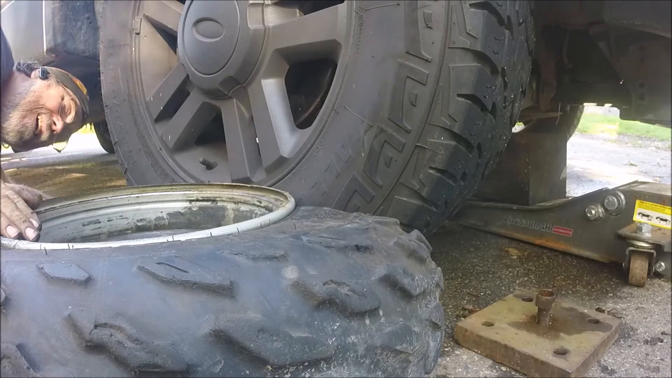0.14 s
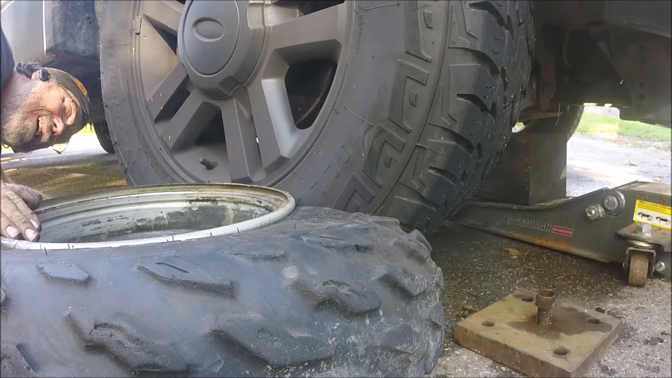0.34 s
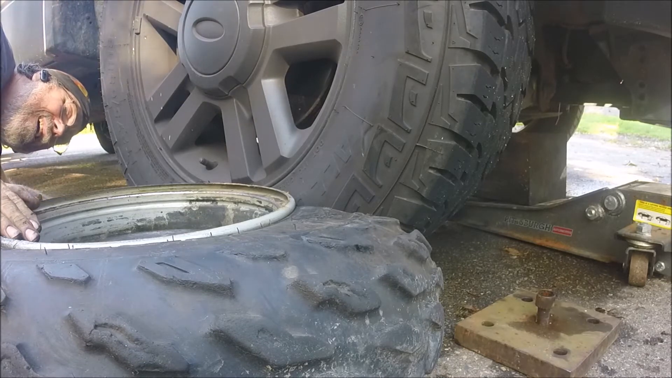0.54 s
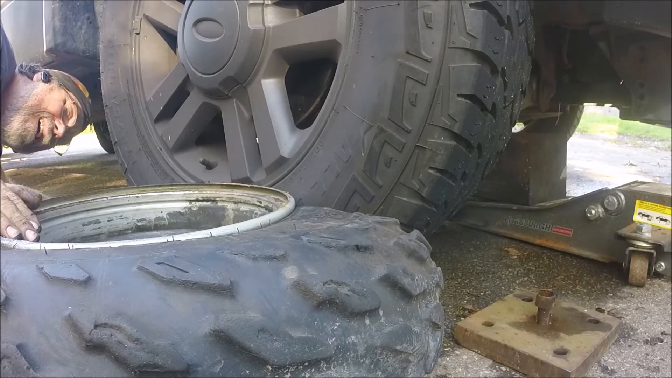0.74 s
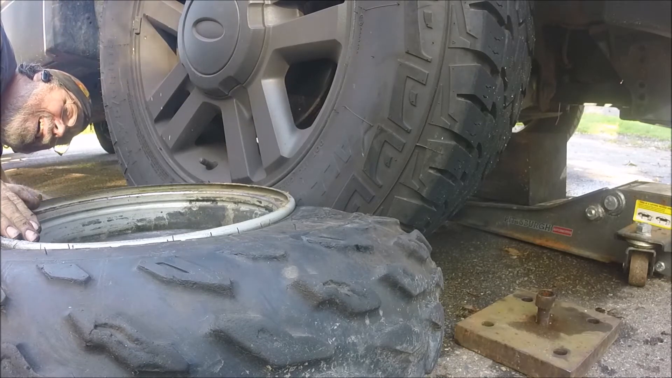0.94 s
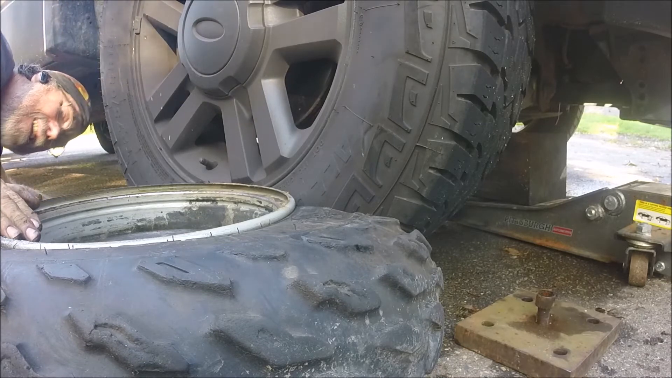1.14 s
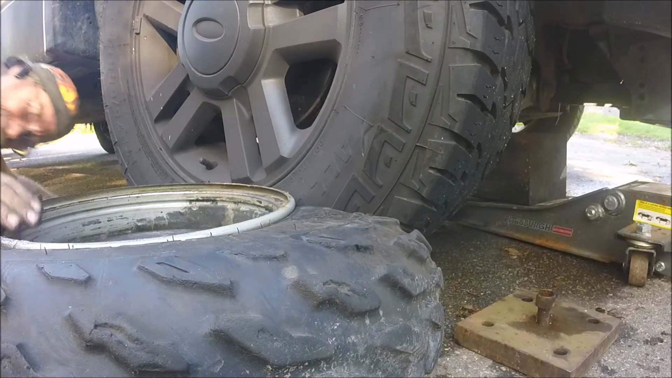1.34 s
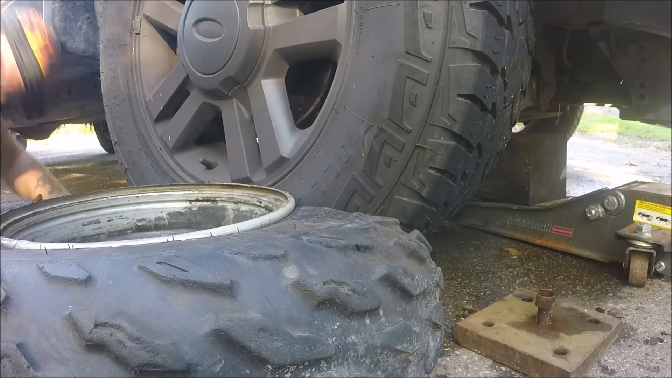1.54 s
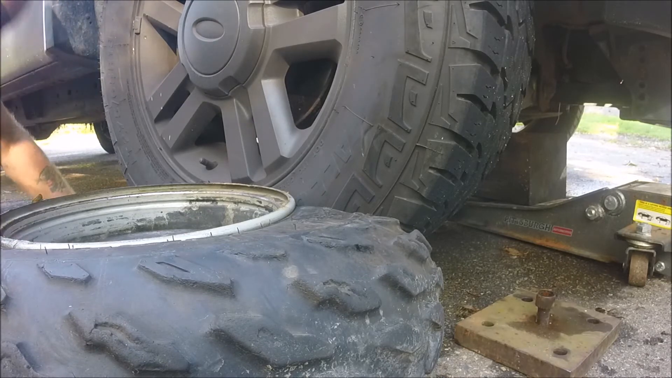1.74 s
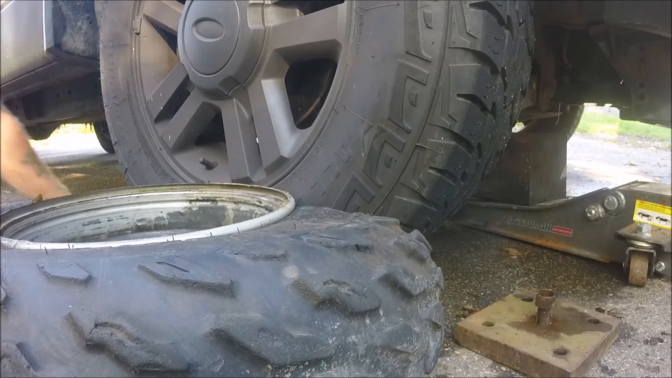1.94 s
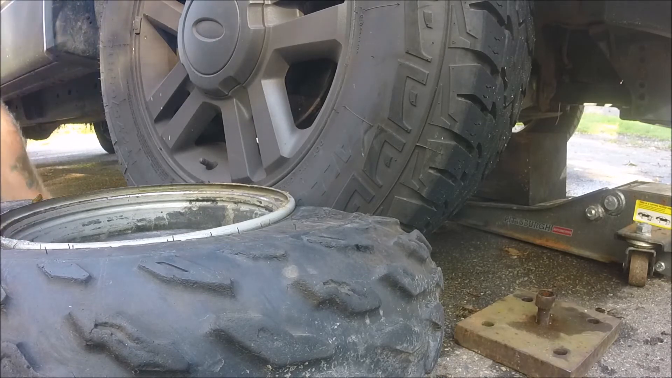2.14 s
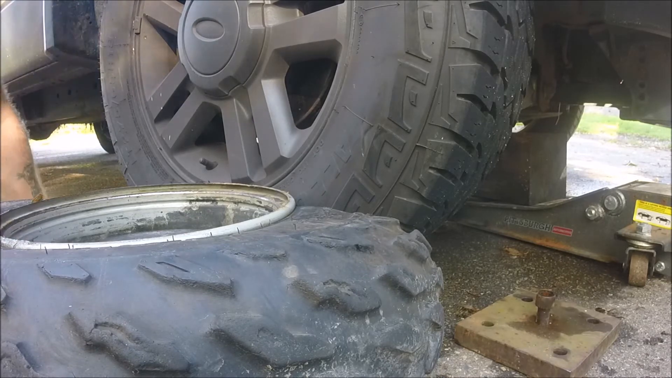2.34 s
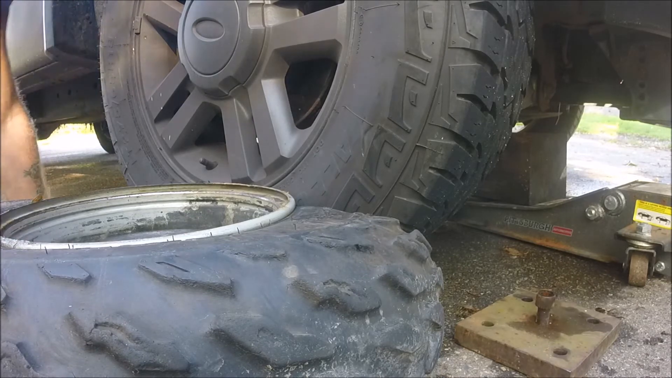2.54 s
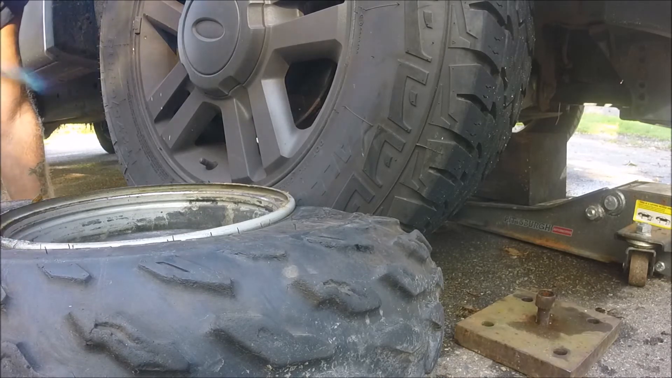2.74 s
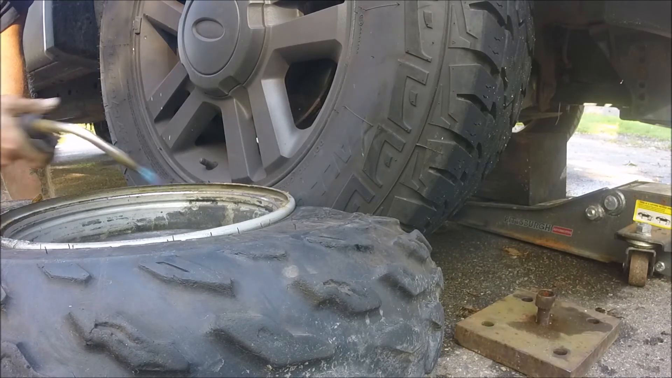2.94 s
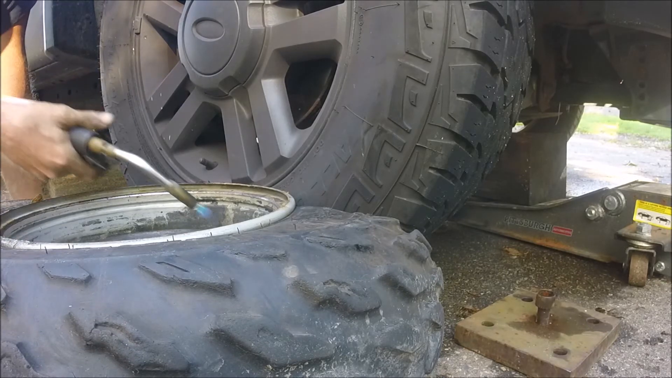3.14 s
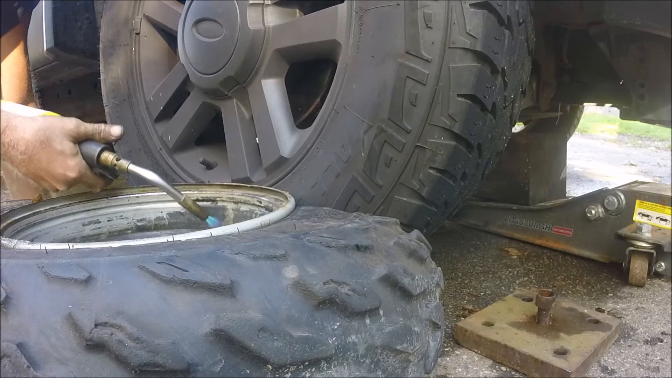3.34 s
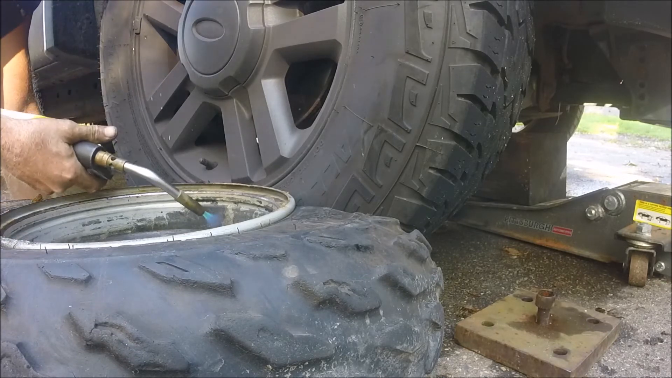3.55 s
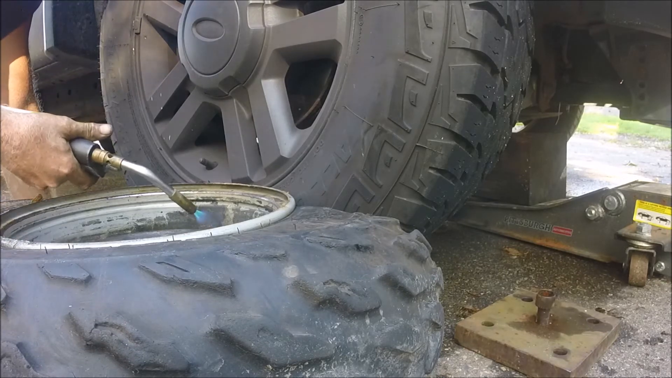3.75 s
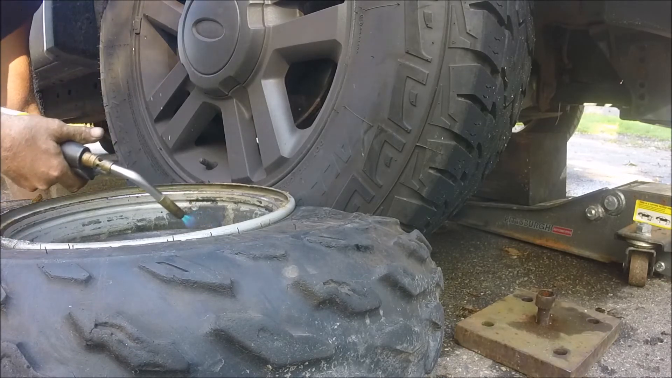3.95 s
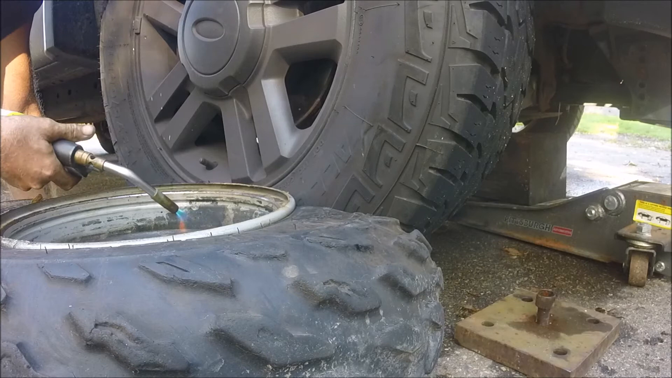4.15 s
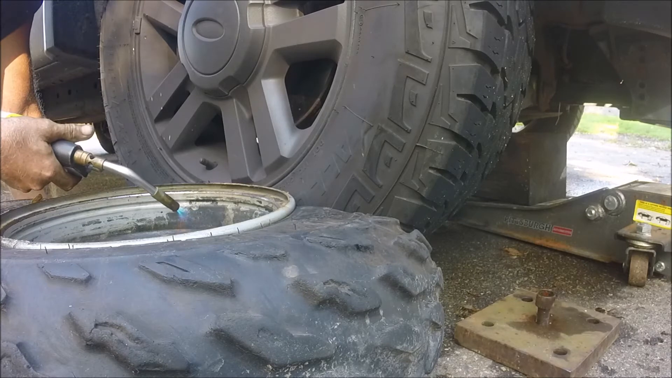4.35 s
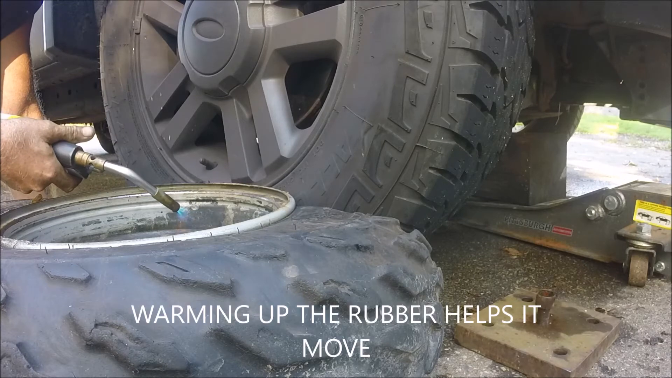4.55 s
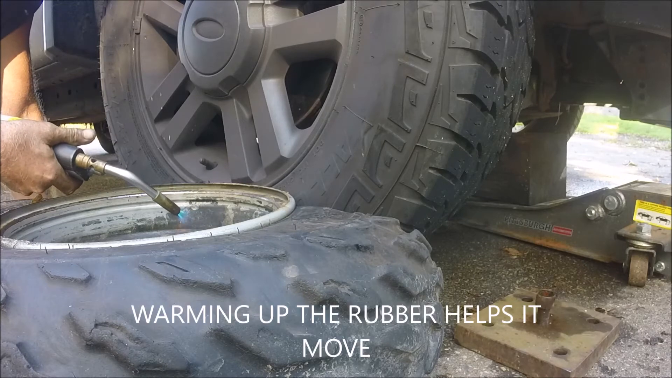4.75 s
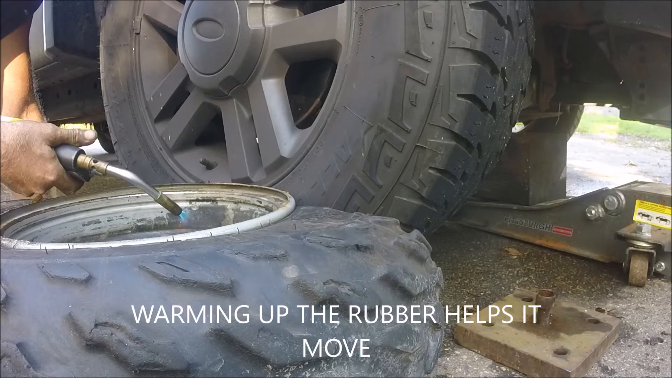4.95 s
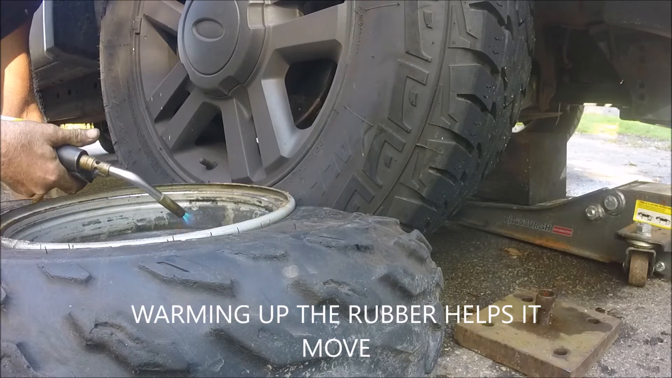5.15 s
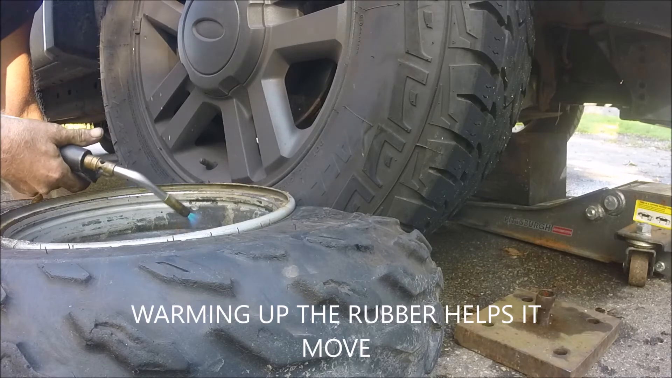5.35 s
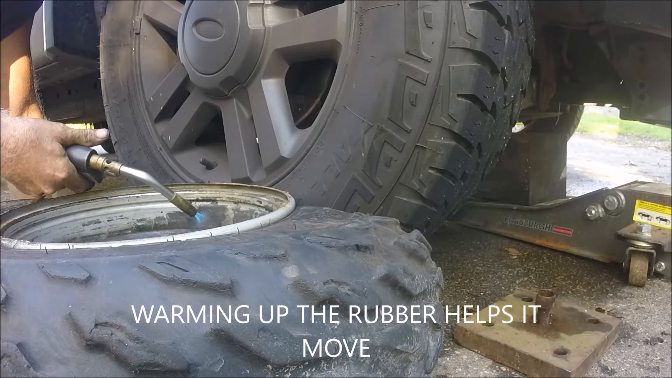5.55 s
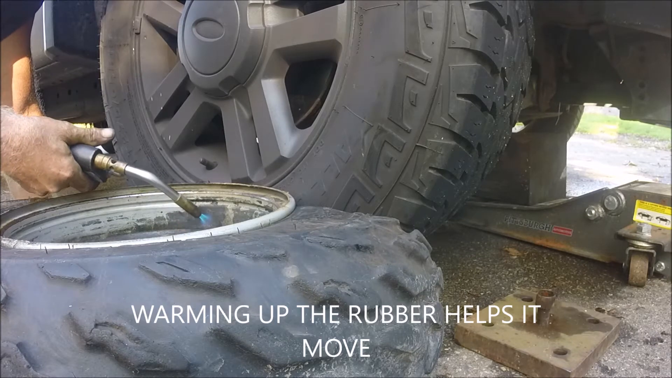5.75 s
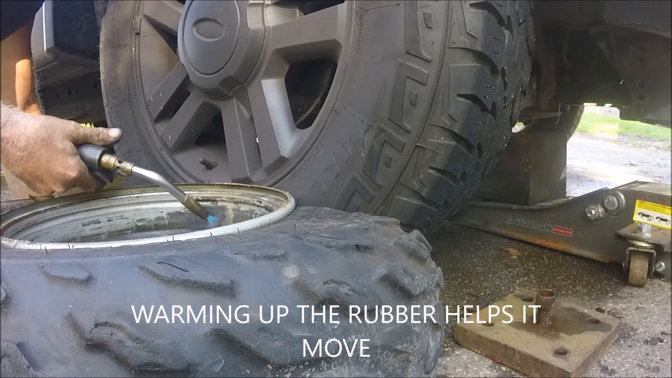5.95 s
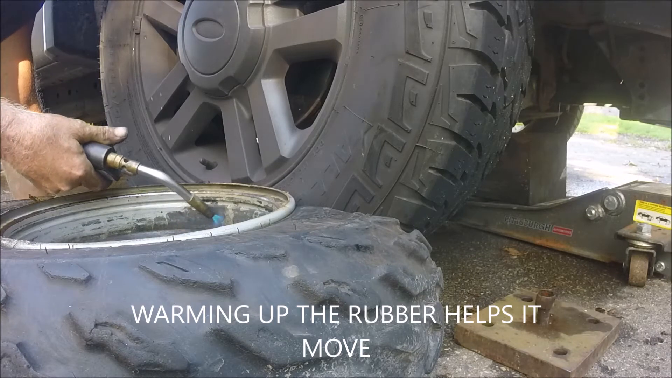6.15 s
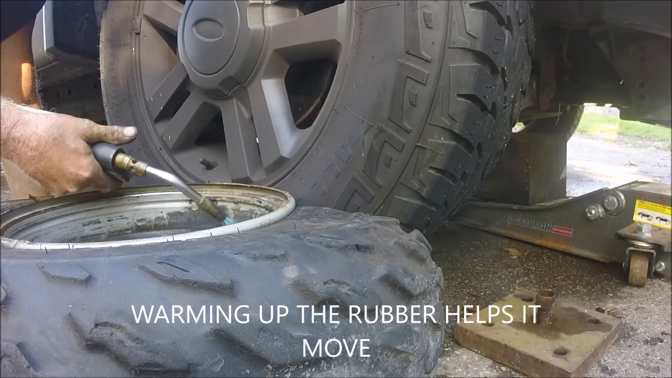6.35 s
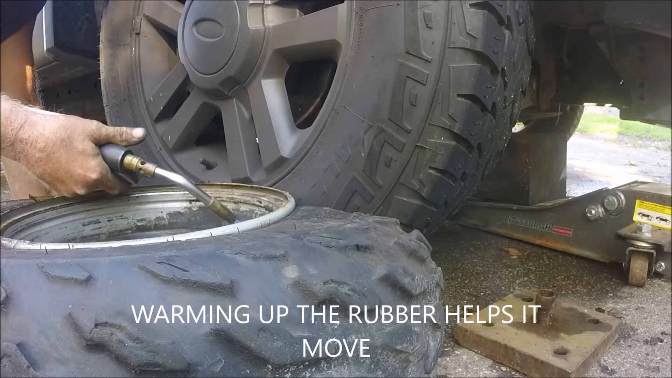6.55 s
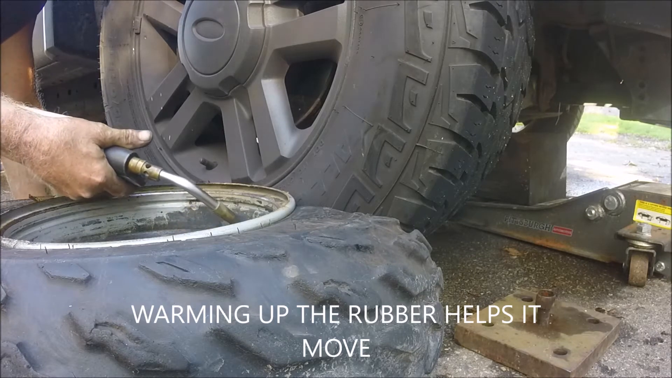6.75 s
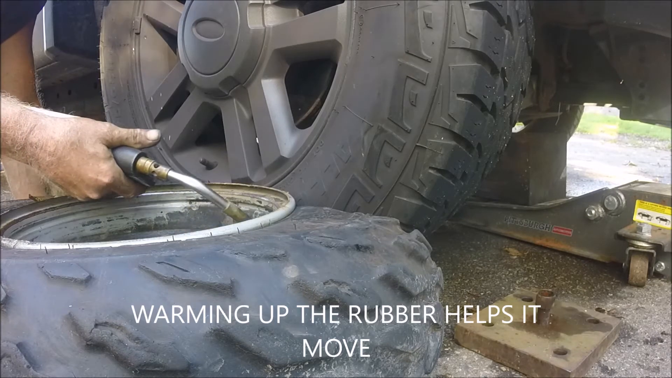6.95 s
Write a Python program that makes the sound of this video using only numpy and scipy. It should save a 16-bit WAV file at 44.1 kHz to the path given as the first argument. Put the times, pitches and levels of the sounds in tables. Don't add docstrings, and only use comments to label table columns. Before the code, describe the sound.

Close handheld camera in an open workshop beside a tire. Low distant rumble and faint hiss, a dull rub with soft knocks, later another thump and bright scrape. A small valve clinks, gas hisses briefly, an igniter snaps and the torch pops alight. The flame roars loudly, swings over the rim, then settles inside the steel wheel, hollow and resonant, its tone shifting until the end.

```python
import sys
import numpy as np
from scipy import signal
from scipy.fft import rfft, irfft
from scipy.io import wavfile
from scipy.ndimage import uniform_filter1d, map_coordinates

SR = 44100
rng = np.random.default_rng(int(sys.argv[2]) if len(sys.argv) > 2 else 0)


def ratio(d):
    e = np.asarray(d, float) / 20
    return 10 ** e


def output_pcm(signal):
    pcm = np.clip(np.atleast_2d(signal).T, -1, 1) * 32767
    wavfile.write(sys.argv[1], SR, np.round(pcm).astype(np.int16))


N = 308024
T_S = np.arange(N) / SR
BLOCK, HOP = 2048, 512
HZ = np.fft.rfftfreq(BLOCK, 1 / SR)
FRAMES_S = np.arange(-(-N // HOP) + 1) * HOP / SR


def unit(x):
    return x / np.sqrt(np.mean(x ** 2) + 1e-20)


def along(points, hz):
    f, v = np.transpose(points)
    return np.interp(np.log(hz + 1), np.log(f + 1), v)


def curves(rows, t=T_S):
    s, *cols = np.transpose(rows)
    return [np.interp(t, s, c) for c in cols]


def wobble(knots_per_s):
    knots = rng.standard_normal(int(N * knots_per_s / SR) + 4)
    return map_coordinates(knots, [np.arange(N) * knots_per_s / SR])


def power(modes):
    total = np.zeros(len(HZ))
    for f, width, db in modes:
        damping = (HZ * width) ** 2
        total += ratio(2 * db) * damping / ((f * f - HZ * HZ) ** 2 + damping)
    return total


def noise(gain, source=None):
    if source is None:
        source = rng.standard_normal(N)
    z = signal.stft(source, nperseg=BLOCK, noverlap=BLOCK - HOP)[2]
    return signal.istft(z * gain.reshape(len(HZ), -1), nperseg=BLOCK, noverlap=BLOCK - HOP)[1][:N]


def add(track, start_s, modes, attack_s):
    t = np.arange(SR // 5) / SR
    ring = sum(ratio(db - 60 * t / t60) * np.sin(2 * np.pi * hz * t) for hz, db, t60 in modes)
    track[round(start_s * SR):][:len(t)] += ring * (1 - np.exp(-t / attack_s))


def ridge(centre_hz, width_hz, db):
    return ratio(db * np.exp(-((HZ[:, None] - centre_hz) / width_hz) ** 2))


def dip(centre_hz, width_hz, depth):
    return 1 - np.clip(depth, 0, .97) / (1 + ((HZ[:, None] - centre_hz) / width_hz) ** 2)


def around(middle_s, half_s):
    return np.exp(-((FRAMES_S - middle_s) / half_s) ** 2)


# t/s, share in free air [0-1], share shaded by rim [0-1],
# f/Hz cancelled by near rim, f/Hz reinforced by wheel face
TORCH_PATH = [(2.66, 0.84, 0.2, 1380, 3400), (2.9, 1, 0.07, 1440, 3600), (3.0, 0.28, 0.18, 1900, 3600),
              (3.08, 0.74, 0.3, 1740, 3800), (3.2, 0.63, 0.4, 1330, 5100), (3.27, .4, 0.53, 1170, 5050),
              (3.42, 0.17, 0.58, 1210, 5000), (3.6, 0.1, 0.58, 1300, 4430), (3.77, 0.15, .8, 1400, 3700),
              (3.85, 0, .4, 1420, 3800), (4.1, .02, 0.32, 1500, 4500), (4.4, 0.06, 0, 1500, 5020),
              (5.15, 0.08, .05, 1500, 4870), (5.6, .02, 0.4, 1450, 4500), (5.8, 0.06, .55, 1410, 3850),
              (6.15, 0.23, 0.78, 1400, 3700), (6.45, 0, 0.87, 1196, 3460), (6.98, 0, 0.91, 1040, 3460)]


def torch_pose():
    air, shade, near_hz, face_hz = curves(TORCH_PATH, FRAMES_S)
    air, shade = np.clip(air, 0, 1), np.clip(shade, 0, 1)
    pose = np.array([air, shade, np.clip(1 - air - shade, 0, 1)])
    return air, shade, pose / pose.sum(axis=0), near_hz, face_hz


# f/Hz, width/Hz, level/dB
AIR_MODES = [(231, 44, -15.5), (495, 83, -20), (700, 140, -22), (1055, 36, 1.5), (1500, 190, -14),
             (2300, 59, -14), (2670, 97, -18), (3600, 280, -19), (4500, 520, -19.5), (6200, 990, -28)]
SHADED_MODES = [(200, 78, -15.5), (259, 40, -6), (507, 30, 0), (619, 37, 2.5), (826, 89, -6),
                (979, 40, 2.5), (1400, 77, -23), (1900, 60, -14), (2380, 190, -17), (3130, 110, -24.5),
                (3600, 170, -25.5), (4104, 230, -17.5), (5050, 550, -12.5), (5920, 1170, -16),
                (7920, 500, -48)]
WHEEL_MODES = [(199, 25, -14.5), (248, 82, -7), (528, 48, -8.5), (658, 71, -4), (963, 114, -2),
               (1116, 31, -6), (1400, 50, -12), (1610, 21, -17), (2010, 34, -25), (2400, 130, -10),
               (2810, 55, -12.5), (3200, 310, -19), (3680, 330, -20), (4200, 630, -14.5),
               (5020, 330, -19.5), (5460, 180, -16), (6300, 390, -20), (6930, 180, -21.5), (8500, 500, -32)]
# f/Hz, level/dB per Hz
FLAME_FLOOR = [(25, -46), (60, -40.5), (130, -21), (300, -19.5), (400, -56), (800, -17), (2000, -14.5),
               (5000, -33), (9000, -37.5), (14000, -71), (16000, -62)]


def cavity_colour(pose):
    floor = ratio(2 * along(FLAME_FLOOR, HZ))
    log_power = np.log([power(m) + floor for m in (AIR_MODES, SHADED_MODES, WHEEL_MODES)])
    return np.exp(log_power.T @ pose / 2)


def rim_comb(pose, near_hz, face_hz):
    near_depth = (0.75, 1, 0.92) @ pose
    far_depth = (.3, .5, 0.2) @ pose
    far_hz = near_hz * ((1.4, 2.3, 2.3) @ pose)
    face_db = (4, 4, 6) @ pose
    flicker = uniform_filter1d(rng.standard_normal((2, len(FRAMES_S))), size=4, axis=1)
    gain = dip(near_hz * (1 + .02 * flicker[0]), 65, near_depth * (.95 + .25 * flicker[1]))
    return gain * dip(far_hz, 180, far_depth) * ridge(face_hz, 420, face_db)


# mid t/s, half length/s, f/Hz, level/dB (+ reinforces, - cancels)
PASSING = [(3.3, .08, 2140, -14), (3.3, .1, 2980, -9), (3.5, .2, 2360, 3.5), (3.55, 0.16, 3860, -5),
           (3.9, .15, 3110, -6.5), (3.95, .2, 2400, 2.5), (5.45, .12, 3300, -5), (5.8, .35, 2810, 4),
           (6.15, .2, 3350, -5), (6.502, .15, 3150, 5.5), (6.7, 0.38, 2550, 6), (6.75, .3, 1500, 3),
           (6.75, .3, 2090, -7), (2.83, .1, 3150, -4), (3.0, .1, 2050, 5), (3.07, .06, 3800, 4),
           (3.72, .08, 5300, 5), (5.75, .2, 5250, -4), (6.35, .2, 2350, 6), (6.45, .15, 4200, 4),
           (6.6, .2, 550, 3), (6.8, .2, 1080, -4)]


def passing_reflections():
    gain = 1
    for mid_s, half_s, hz, db in PASSING:
        gain = gain * ridge(hz, 0.065 * hz, db * around(mid_s, half_s))
    return gain


# f/Hz, width/Hz, depth [0-1] facing, half shaded, shaded
FIXED_DIPS = [(410, 40, .7, .7, .7), (590, 25, .5, .5, .5), (1770, 40, .7, .6, .2), (1650, 50, .05, .1, .6),
              (2130, 50, .7, .3, .8), (2630, 60, .4, .9, .2), (3480, 50, .7, .6, .2),
              (3970, 70, .7, .7, .8), (4350, 80, .1, .3, .6), (5500, 120, .5, .4, .3)]


def fixed_reflections(air, shade):
    gain = 1
    for hz, width_hz, *depths in FIXED_DIPS:
        gain = gain * dip(hz, width_hz, (1 - air) * np.interp(shade, [0, .5, 1], depths))
    return gain


def trembling_bands():
    bands = rng.standard_normal((len(HZ), len(FRAMES_S)))
    bands = uniform_filter1d(uniform_filter1d(bands, size=4, axis=0), size=30, axis=1)
    spread_db = [(300, 0.27), (1500, 2.26), (3000, 2.55), (5000, 2.1), (9000, 2.4), (14000, 2.1)]
    return ratio(unit(bands) * along(spread_db, HZ)[:, None])


# t/s, level/dB
FLAME_LEVEL = [(2.68, -27.5), (2.785, -19.5), (2.85, -23), (2.92, -21.5), (2.97, -26.5), (3.14, -19),
               (3.3, -24), (3.42, -21.5), (3.77, -29), (3.81, -21), (4.12, -23.5), (4.3, -20), (4.78, -20),
               (5.15, -22.5), (5.7, -23), (6.3, -27), (6.47, -27), (6.98, -26.5)]
LAYER_EDGES = [0, 400, 1250, 4000, 20000]
# level/dB at mean loudness, growth/dB per dB, added in air/dB, added in shade/dB, own wander/dB
LAYER_LEVELS = [
    (-28.5, -.1, -4.5, 2, 0.86),
    (-23, 1.05, -0.3, 0.2, .5),
    (-27.5, 0.5, -4, -2.5, 1.28),
    (-33, 0.43, -8, -8.5, 0.5),
]


def flame():
    air, shade, pose, near_hz, face_hz = torch_pose()
    swing = around(2.953, 0.089)
    swing_lift_db = (-1.2, .1, 3.5, 1.2)
    colour = cavity_colour(pose) * rim_comb(pose, near_hz, face_hz)
    colour *= ridge(.85 * near_hz, 230, 10.5 * swing)
    colour *= passing_reflections() * fixed_reflections(air, shade) * trembling_bands()

    burning = unit(ratio(0.73 * wobble(25) + 0.54 * wobble(160)) * rng.standard_normal(N))
    loudness_db = curves(FLAME_LEVEL, FRAMES_S)[0] + 23

    def above(edge_hz):
        return 1 / (1 + (edge_hz / (HZ + 1)) ** 14)

    out = np.zeros(N)
    for lo, hi, law, lift_db in zip(LAYER_EDGES, LAYER_EDGES[1:], LAYER_LEVELS, swing_lift_db):
        db, growth, air_db, shade_db, wander_db = law
        part = colour * (above(lo) - above(hi))[:, None]
        part /= np.sqrt(np.sum(part ** 2, axis=0) / len(HZ))
        part *= ratio(db + growth * loudness_db + air_db * air + shade_db * shade + lift_db * swing)
        out += ratio(wander_db * wobble(7)) * noise(part, burning)
    lit = np.clip((T_S - 2.664) / 0.0085, 0, 1)
    return out * lit


# f/Hz, level/dB per Hz
BRIGHT_NOISE = [(1000, -7), (3000, -16), (5500, -6), (9000, -15), (13000, -18), (16000, -30)]


def bright_gain(share=1):
    return ratio(along(BRIGHT_NOISE, HZ) * share)


def burst(start_s, db, t60_s, attack_s):
    t = (T_S - start_s).clip(0)
    return ratio(db - 60 * t / t60_s) * (1 - np.exp(-t / attack_s)) * noise(bright_gain(.5))


# f/Hz, level/dB, t60/s
POP_MODES = [(160, 0, 0.014), (900, -2, 0.011), (2840, -16, 0.011)]


def pop():
    push = np.zeros(N + SR)
    add(push, 2.6626, POP_MODES, attack_s=0.00096)
    return (ratio(-8) * np.roll(push, round(0.0023 * SR)) - push)[:N]


def rattle():
    return 1 + .5 * wobble(1500)


# f/Hz, level/dB, t60/s
SPARK_MODES = [(3000, -14.5, 0.0096), (6100, -17.5, 0.012), (10600, -25.5, .012), (12500, -26, .01)]


def spark():
    start_s = 2.6601
    track = np.zeros(N + SR)
    add(track, start_s, SPARK_MODES, attack_s=0.00047)
    return track[:N] * rattle() + burst(start_s, -17.5, 0.056, .0005)


# t/s, level/dB
GAS_LEVEL = [
    (2.6, -86),
    (2.611, -54),
    (2.6175, -48),
    (2.62, -44),
    (2.658, -43.5),
    (2.67, -33),
    (2.69, -90),
]
# f/Hz, width/Hz, level/dB
NOZZLE_MODES = [(970, 150, -1), (2240, 130, -4), (3460, 170, 1), (4670, 250, -3), (5200, 330, 1),
                (6260, 400, -4), (9140, 600, -13), (10500, 800, -10), (12500, 1500, -18)]
# t/s, level/dB
SEEP_LEVEL = [
    (2.3, -95),
    (2.38, -74),
    (2.6, -70),
    (2.66, -95),
]


def gas():
    valve = noise(np.sqrt(power([(6450, 250, 0), (10500, 400, -8)])))
    nozzle = noise(np.sqrt(power(NOZZLE_MODES) + ratio(2 * along(BRIGHT_NOISE, HZ) - 30)))
    return ratio(curves(SEEP_LEVEL)[0]) * unit(valve) + ratio(curves(GAS_LEVEL)[0]) * unit(nozzle)


# f/Hz, level/dB, t60/s
VALVE_MODES = [(1800, -41, .05), (2750, -29.5, 0.041), (2820, -51, 0.22), (4200, -42, .03),
               (6385, -51, 0.054), (7850, -43, .05), (8700, -44, .06), (10660, -37, .04), (11880, -47, .05),
               (13970, -44, .05)]


def valve_clink():
    start_s = 2.2195
    track = np.zeros(N + SR)
    add(track, start_s, VALVE_MODES, attack_s=.004)
    return track[:N] * rattle() + burst(start_s, -36, 0.091, 0.0025)


# t/s, peak level/dB, f/Hz, t60/s
KNOCK_EVENTS = [(.476, -49, 557, .03), (0.537, -45, 1460, .05), (.58, -52, 1690, .06),
                (.628, -42, 222, 0.044), (0.665, -32.5, 624, 0.012), (0.673, -41, 174, 0.077),
                (.72, -53, 2590, .02), (0.688, -43, 337, 0.072), (1.536, -29.5, 233, 0.027),
                (1.5545, -46, 900, 0.035), (1.565, -44, 302, 0.064), (1.871, -43, 75, 0.33),
                (2.5963, -39, 970, 0.028)]


def knocks():
    track = np.zeros(N + SR)
    for s, db, hz, t60 in KNOCK_EVENTS:
        modes = [(hz, db + 3.0, t60), (1.52 * hz, db - 12, 0.67 * t60)]
        add(track, s, modes, attack_s=0.17 / hz)
    return track[:N] + burst(.665, -52, .06, .001)


# f/Hz, level/dB per Hz
DULL_NOISE = [(300, -20), (800, -1), (1600, -5), (4200, -15), (8000, -29), (16000, -40)]
# t/s at full strength, rise/s, hold/s, level/dB, brightness [0-1]
SCUFF_EVENTS = [
    (0.467, 0.044, .16, -59, 0.2),
    (0.667, 0.056, .01, -51.5, .25),
    (.7, .03, .08, -57.5, .35),
    (1.49, .04, .06, -65, 0.2),
    (1.53, .03, .015, -60, 0.1),
    (1.556, .004, .012, -51, 0.7),
    (1.57, .01, .02, -57, .95),
    (2.2, .004, .008, -56, 0.2),
]


def scuffs():
    dull = unit(noise(ratio(along(DULL_NOISE, HZ))))
    bright = unit(noise(bright_gain()))
    fall_db_per_s = 900
    rub = np.zeros(N)
    for s, rise, hold, db, share in SCUFF_EVENTS:
        shape = np.clip(1 + (T_S - s) / rise, 0, 1) ** 2
        shape *= ratio(-fall_db_per_s * (T_S - s - hold).clip(0))
        rub += ratio(db) * shape * ((1 - share) * dull + share * bright)
    return ratio(2.8 * wobble(90)) * rub


# f/Hz, level/dB per Hz
YARD_NOISE = [(12, -49), (20, -10.5), (107, -1), (177, -12.5), (216, -12.5), (388, -18.5), (642, -21),
              (780, -22.5), (1090, -24), (1400, -24), (6540, -39), (14300, -51.5), (16000, -62)]


def yard():
    return ratio(-49.5 + 0.77 * wobble(10.97)) * unit(noise(ratio(along(YARD_NOISE, HZ))))


def scene():
    mix = flame() + pop() + spark() + gas() + valve_clink() + knocks() + scuffs() + yard()
    return mix[None]


# f/Hz, level/dB
MIC_RESPONSE = [(20, -6), (45, 0), (12000, -0.5), (14000, -3), (15300, -8)]


def microphone(dry):
    full_hz = np.fft.rfftfreq(N, 1 / SR)
    return irfft(rfft(dry) * ratio(along(MIC_RESPONSE, full_hz)) * (full_hz < 15330), N)


DROPOUT_TIMES = [.2, .328, .457, .819, .862, 1.011, 1.416, 1.459, 1.694, 1.715, 1.736, 1.758, 2.078, 2.376,
                 2.505, 2.804, 3.23, 3.38, 3.464, 3.593, 3.913, 4.062, 4.423, 5.406, 5.811, 5.895, 6.068,
                 6.387, 6.43, 6.536]


def dropouts(x):
    frame = 941
    n, k = np.arange(2 * frame) + .5, np.arange(frame) + .5
    window = np.sin(np.pi * n / (2 * frame)) * np.sqrt(2 / frame)
    basis = np.cos(np.pi / frame * np.outer(k, n + frame / 2)) * window
    hz = k * SR / (2 * frame)
    first = round(DROPOUT_TIMES[0] * SR)
    starts = [first + frame * (round((s * SR - first) / frame) - 1) for s in DROPOUT_TIMES]
    lines = np.array([basis @ x[0, a:a + 2 * frame] for a in starts])
    step = 4.6 * np.sqrt(abs(uniform_filter1d(lines ** 2, 60, axis=1)))
    kept = np.round(lines / step) * step * (hz < 6600) * .75
    lost = ((lines - kept) * (hz > 2000)) @ basis
    out = x.copy()
    for a, part in zip(starts, lost):
        out[0, a:a + 2 * frame] -= part
    return out


def low_pass(x):
    return signal.sosfilt(signal.butter(12, 16310, fs=SR, output="sos"), x)


def record(dry):
    mix = dropouts(microphone(dry))
    return low_pass(mix)


dry = scene()
out = record(dry)
output_pcm(out)
```